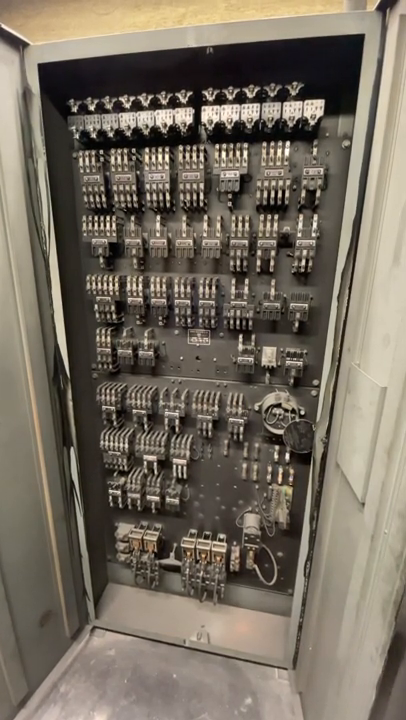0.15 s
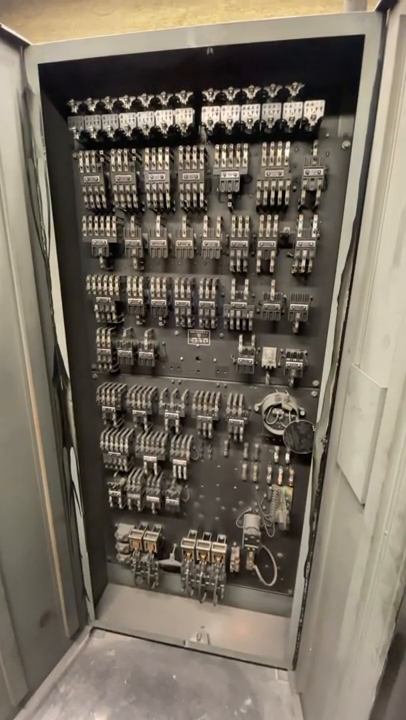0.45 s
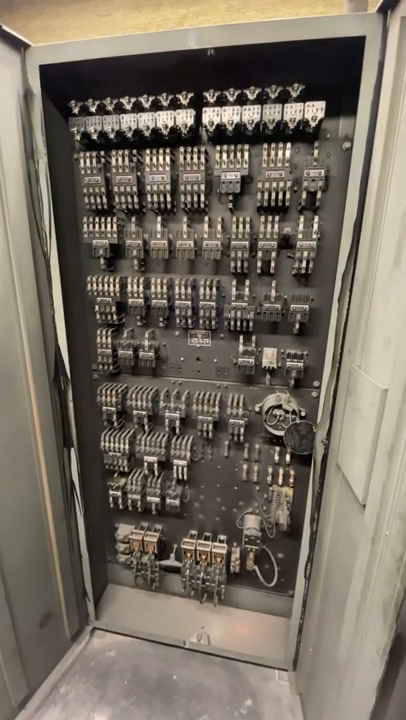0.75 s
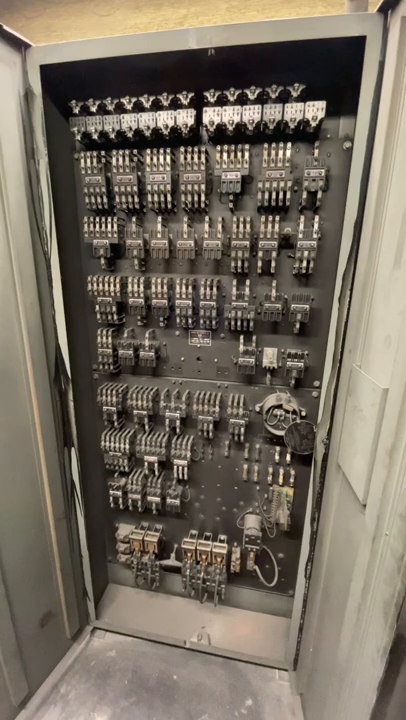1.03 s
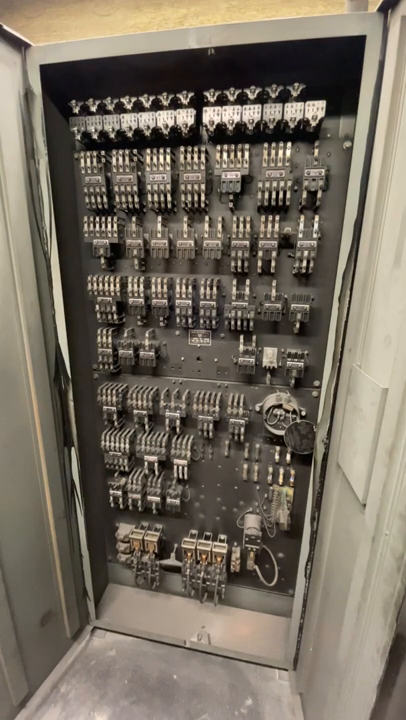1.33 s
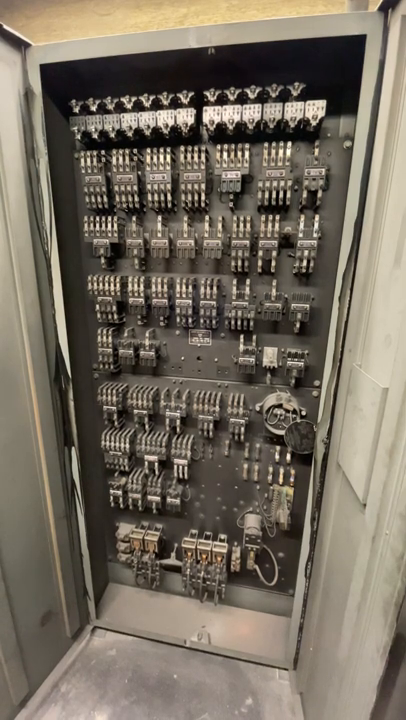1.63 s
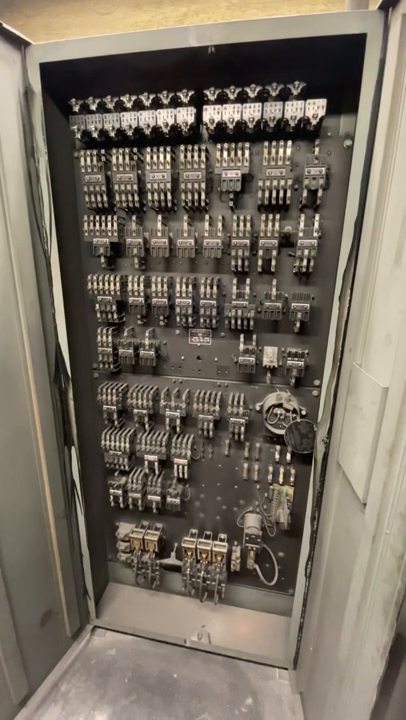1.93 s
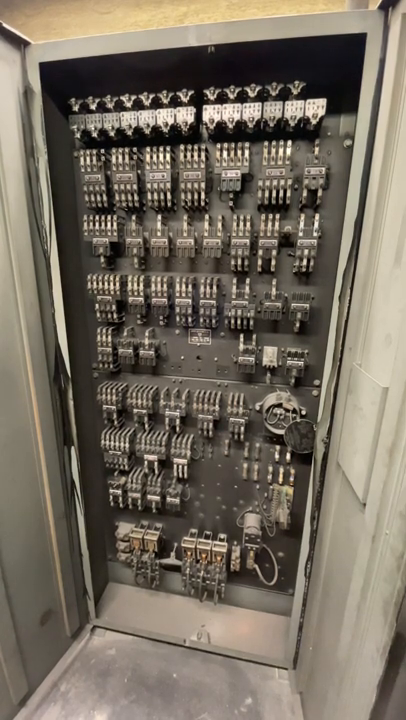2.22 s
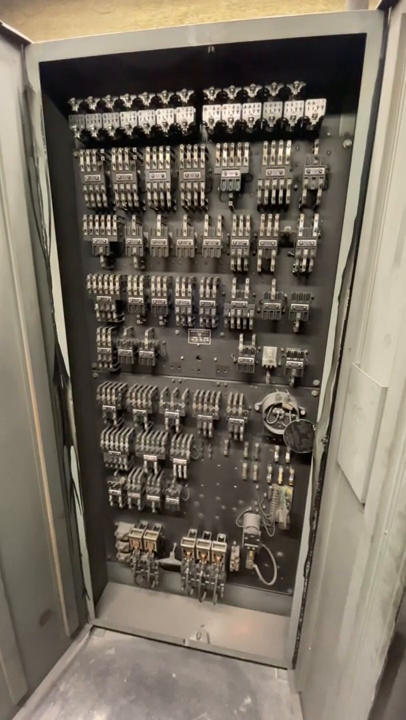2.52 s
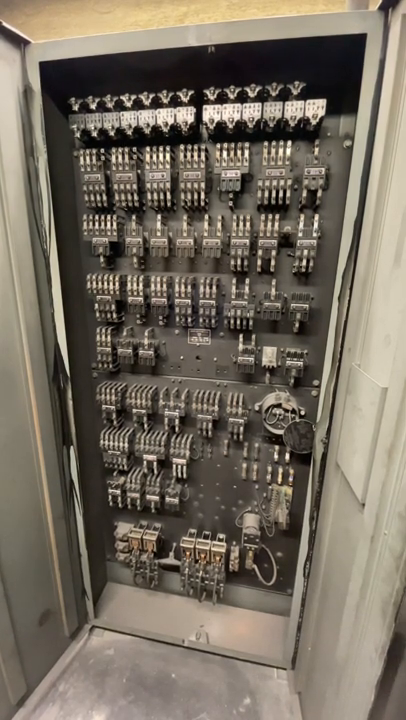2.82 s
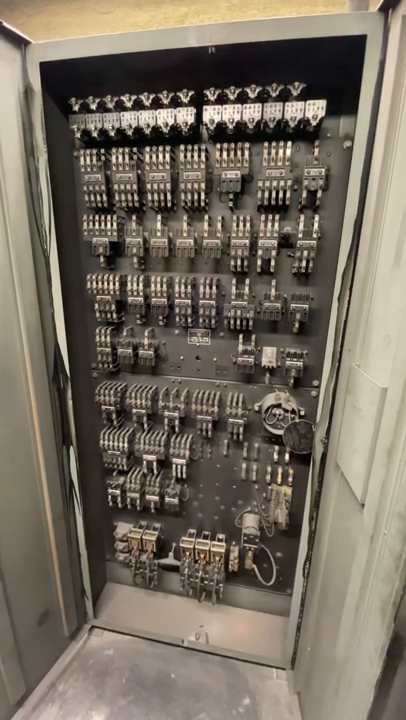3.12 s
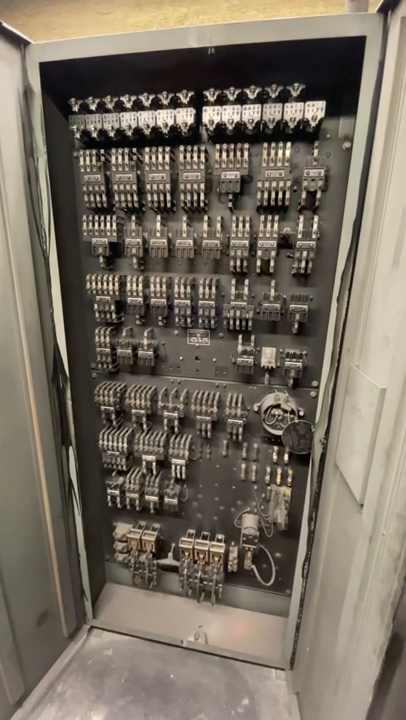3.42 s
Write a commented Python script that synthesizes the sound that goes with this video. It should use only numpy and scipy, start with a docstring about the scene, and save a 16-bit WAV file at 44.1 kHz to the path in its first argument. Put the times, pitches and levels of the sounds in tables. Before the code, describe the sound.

Electrical relays snap and clatter on a steel panel, with fans droning and a thin whine behind.

```python
"""Relays on a steel panel in an open metal cabinet pull in and drop out, alone and in quick bursts.
Each contact is a noise crack and pitched knock that rings frames, springs and armatures and dies in the cabinet.
Fans and hum fill the machine room: coloured noise with broad drones, wavering sine lines and a thin whine.
Two close microphone ports pick it up; a slow gain control ducks after loud treble bursts."""
import sys
import numpy as np
from scipy import signal
from scipy.fft import rfft, irfft
from scipy.io import wavfile

SR = 44100
rng = np.random.default_rng(int(sys.argv[2]) if len(sys.argv) > 2 else 0)


def wav_out(sig):
    """Save sig, one row per channel (or a flat mono array), as 16-bit PCM at SR to the path in sys.argv[1]."""
    wavfile.write(sys.argv[1], SR, np.round(np.clip(np.atleast_2d(sig).T, -1, 1) * 32767).astype(np.int16))


N = 156996

# machine-room air noise, before drones and level changes: [hz, density_db_per_hz]
AIR = [(22, -84), (50, -63.5), (80, -67), (120, -60.5), (250, -59.5), (420, -61.5), (700, -60.5),
       (1300, -70), (2600, -71.5), (3900, -79), (4900, -67.5), (6000, -78), (7800, -89), (9500, -84),
       (11000, -96), (12800, -95.5), (14000, -125)]
# broad drones of ducts and housings: [centre_hz, width_hz, over_air_db]
DRONES = [(91.7, 11.6, 8), (145.9, 5.3, 10.5), (195.1, 29.3, 11.5), (303, 8.9, 7), (331.1, 15.8, 12.5),
          (1067, 16.4, 7.5), (1910, 76, 10.5)]
# level of the air noise and drones below the low top: [time_s, level_db]
LOW_AIR_LEVEL = [(0, -1.5), (.5, -2), (1.05, -0.5), (1.4, -1.1), (1.9, 0.2), (2.2, -2), (2.6, 2),
                 (3.1, -1.3), (3.56, -1)]
# mains and motor hum lines, before waver: [pitch_hz, level_db_rms]
HUM = [(359.5, -41)]
# level of a thin whine, before waver: [time_s, level_db_rms]
WHINE = [(0, -47), (.8, -46.5), (1.05, -54), (1.9, -51.5), (2.5, -47), (3.56, -47)]
LOW_AIR_TOP_HZ, WHINE_HZ = 600, 1437.5
AIR_FLICKER_DB, HUM_WAVER_DB = 1.23, 2

# relay contacts, relative levels: [start_s, level_db, tilt_db_per_octave, knock_hz, knock_db, knock_t60_s,
# ping_db, jangle_db]
CONTACTS = [(0.8936, -34, 6.5, 5400, -24, .03, -44, -34),
            (0.8965, -21, -5.5, 1760, -6.5, 0.016, -19.5, -41),
            (0.9017, -28, -1.5, 1486, -22, 0.2, -43, -29), (2.046, -30, -2.5, 14800, -24, .03, -24, -45),
            (2.0564, -21.5, -3, 2060, -4, 0.019, -25, -39), (2.0572, -29, 3, 3680, -11, 0.042, -24, -41),
            (2.07, -29, -8, 3440, -14.5, 0.11, -36, -34), (2.095, -24, 0.5, 3850, -16, 0.033, -24, -29),
            (2.096, -22.5, -3, 2025, -9.5, 0.033, -24, -26), (2.099, -33, -6, 2730, -13, .03, -22, -38),
            (2.217, -44.5, 8, 3000, -41, .03, -42, -27), (2.2252, -29, -1, 9000, -12, .02, -39, -32),
            (2.238, -36.5, -12, 8650, -15, 0.019, -61, -30), (2.326, -32, 3, 6250, -32, 0.044, -34, -39),
            (2.332, -31, -8.5, 1860, -20, 0.056, -27, -37), (2.334, -38, -12, 998, -18, 0.23, -39, -45),
            (2.821, -31, 2, 9300, -19, .02, -30, -40), (2.83, -26, 1, 6440, -32, .03, -27, -19.5),
            (2.838, -31.5, -1, 5370, -27, .03, -23, -22), (2.843, -20.5, 1, 5400, -23, .04, -23, -13),
            (2.849, -34, 5, 1810, -17.5, 0.057, -23, -18), (2.861, -26.5, 5, 946, -16, 0.041, -28, -32),
            (2.869, -26, -4.5, 1820, -20, 0.034, -21, -25),
            (2.909, -22, -1.5, 4320, -13.5, 0.081, -30, -34),
            (2.9078, -19.5, -2.5, 1080, -13, 0.057, -10, -30)]
# cabinet wash after a contact: [hz, relative_db, t60_s]
WASH = [(493, -22, 0.99), (950, -7, 0.63), (2040, -2, 0.58), (4040, 0.5, 0.26), (6500, 3, 0.27),
        (9000, 1.5, 0.14), (11300, -8, 0.2), (13500, -14, .15), (16000, -4, 0.083)]
# relay frame modes, rung by every contact: [pitch_hz, re_contact_db, t60_s]
FRAME = [(1127, -9, 0.069), (1568, -11, 0.094), (1944, -6, 0.06), (2760, -7.5, 0.072), (3350, -4, 0.12),
         (3645, -9.5, 0.14), (3860, -12.5, 0.039), (4340, -31, 0.089), (5036, -7, 0.059), (6360, -4, 0.07)]
# high ping of the contact springs: [pitch_hz, re_ping_db, t60_s]
PING = [(15300, -3, .03), (15480, -9, .11), (15565, -1, .06), (15720, -9, .12)]
# bright jangle of the armatures: [pitch_hz, re_jangle_db, t60_s]
JANGLE = [(10620, -5, .03), (11000, -4, .03), (11175, -3, .045), (11650, -5, .03)]
TILT_PIVOT_HZ = 3000
FRAME_SPREAD_DB, BRIGHT_SPREAD_DB, CHATTER_T60_S = 3, 2, .02
RATTLE_DB, RATTLE_PER_S = 2.5, 1500
CRACK_T60_S, CRACK_RISE_T60_S, TAIL_DB = .0079, .005, -6
# split: share of pitch between the two knock tones; side: gain in the second view
KNOCK_RISE_S, KNOCK_SPLIT, KNOCK_ROUGH_DB, KNOCK_SIDE = .0006, .017, 3.2, .6

# microphone pair: [hz, left_lead_rad, likeness_0_to_1, left_minus_right_db]
PORTS = [(70, 0, .997, 0), (230, 0, .99, 2), (330, -.1, .96, 4.5), (700, -.5, .62, 4.6),
         (1200, -.5, .75, 2.5), (1800, -.7, .72, 3), (2200, -1.1, .35, 0), (3700, -1.6, .3, 0),
         (4300, .8, .3, 2), (5800, 1.4, .25, .5), (6600, 2.6, .6, -1), (7300, 3.14, .85, -.5),
         (9200, 4.1, .65, -1.5), (10300, 6.28, .98, 0), (11800, 6.3, .97, 0), (12500, 7.5, .5, 0),
         (13300, 9.42, .99, 0), (14900, 9.42, .99, 0), (15500, 10.5, .9, .5)]
# share: dB of ducking per dB above the threshold
DUCK_ABOVE_DB, DUCK_SHARE, DUCK_MEMORY_S, DUCK_HEARS_HZ = -26, .76, .23, 2200
STOP_EDGE_HZ = 16400


def from_db(db):
    """Decibels to gain."""
    return 10 ** (np.asarray(db) / 20)


def at_hz(table, hz, axis=1):
    """One column of a table, read on a log-frequency axis."""
    rows = np.array(table)
    return np.interp(np.log(hz + 1e-9), np.log(rows[:, 0]), rows[:, axis])


def drift(rate_hz):
    """Slow chance with spread 1: white noise through two equal low-pass poles, run every 40 samples."""
    r = np.exp(-80 * np.pi * rate_hz / SR)
    noise = rng.standard_normal(N // 40 + 2002)
    slow = signal.lfilter([1], [1, -2 * r, r * r], noise)[2000:]  # drop the run-in
    return np.interp(np.arange(N) / 40, np.arange(len(slow)), slow / slow.std())


def fall(t60_s):
    """Gain per sample of an exponential decay; t60 is at least 5 ms."""
    return from_db(-60 / (max(t60_s, .005) * SR))


def ring(x, hz, t60_s):
    """Two-pole resonator: a unit click sets a decaying sine of starting height 1 ringing."""
    r, w = fall(t60_s), 2 * np.pi * hz / SR
    return signal.lfilter([0, np.sin(w)], [1, -2 * r * np.cos(w), r * r], x + 1e-18)


def clicks(start_s, sizes):
    """Impulse train in two views of the panel."""
    out = np.zeros((2, N))
    out[:, (np.asarray(start_s) * SR).astype(int)] = sizes
    return out


def chatter(start_s, sizes):
    """Contact bounce: a dying burst of random pushes with the mean energy of one click."""
    r = fall(CHATTER_T60_S)
    burst = signal.lfilter([1], [1, -r], clicks(start_s, sizes))
    return np.sqrt(1 - r * r) * burst * rng.standard_normal((2, N))


def air_noise():
    """White noise shaped to the air spectrum, raised around each drone; level flickers slightly."""
    hz, t = np.fft.rfftfreq(N, 1 / SR), np.arange(N) / SR
    gain = from_db(at_hz(AIR, hz))
    for centre_hz, width_hz, over_db in DRONES:
        gain = gain * (1 + (from_db(over_db) - 1) / (1 + (2 * (hz - centre_hz) / width_hz) ** 2))
    noise = rfft(rng.standard_normal((2, N))) * gain * np.sqrt(SR / 2)
    low = 1 / (1 + (hz / LOW_AIR_TOP_HZ) ** 4)
    low_level = from_db(np.interp(t, *np.transpose(LOW_AIR_LEVEL)))
    air = irfft(noise * low, N) * low_level + irfft(noise * (1 - low), N)
    return air * from_db(AIR_FLICKER_DB * drift(2.4))


def hum_and_whine():
    """Steady-pitch sines of wavering level; hum phase differs between views, whine phase does not."""
    t = np.arange(N) / SR
    out = np.zeros((2, N))
    for hz, level_db in HUM:
        level = np.sqrt(2) * from_db(level_db + HUM_WAVER_DB * drift(8.7))
        out += level * np.sin(2 * np.pi * (hz * t + rng.random((2, 1))))
    whine_db = np.interp(t, *np.transpose(WHINE)) + HUM_WAVER_DB * drift(13)
    return out + np.sqrt(2) * from_db(whine_db) * np.sin(2 * np.pi * WHINE_HZ * t)


def machine_room():
    """Air noise plus tonal hum."""
    return air_noise() + hum_and_whine()


def crack_and_wash(start_s, level_db, tilt):
    """Half-octave noise bands, each with a short crack and a longer cabinet decay, roughened by rattle."""
    white = rng.standard_normal((2, 2, N))
    edges_hz = 420 * 2 ** np.arange(0, 5.6, .5)
    jolts = np.minimum(rng.exponential(1, N), 4) - 1.5
    rattle = from_db(RATTLE_DB * np.repeat(jolts, int(SR / RATTLE_PER_S))[:N])
    out, rise = np.zeros((2, N)), fall(CRACK_RISE_T60_S)
    for k, (low, high) in enumerate(zip(edges_hz, edges_hz[1:])):
        hz = np.sqrt(low * high)
        band_db = level_db + tilt * np.log2(hz / TILT_PIVOT_HZ) + at_hz(WASH, hz)
        hits = clicks(start_s, from_db(band_db) ** 2)[0] + 1e-30
        # squared gains: both decays are of power
        crack = signal.lfilter([1], [1, -fall(CRACK_T60_S) ** 2], hits)
        tail = signal.lfilter([1], [1, -fall(at_hz(WASH, hz, axis=2)) ** 2], hits)
        power = crack + from_db(2 * TAIL_DB) * tail
        shape = signal.lfilter([1 - rise], [1, -rise], np.sqrt(power) * rattle)
        band = signal.butter(2, [low, high], "band", fs=SR, output="sos")
        out += 4 * shape * signal.sosfilt(band, white[k % 2])
    return out


def frame_modes(start_s, level_db, tilt):
    """Contact bounce rings the frame resonances, with chance in each mode's strength."""
    out = np.zeros((2, N))
    for hz, mode_db, t60_s in FRAME:
        luck_db = FRAME_SPREAD_DB * rng.standard_normal((2, len(start_s)))
        size_db = level_db + mode_db + tilt * np.log2(hz / TILT_PIVOT_HZ) + luck_db
        out += ring(chatter(start_s, from_db(size_db)), hz, t60_s)
    return out


def bright_modes(modes, start_s, level_db):
    """Contact bounce rings the high resonances of springs or armatures."""
    out = np.zeros((2, N))
    for hz, mode_db, t60_s in modes:
        luck_db = BRIGHT_SPREAD_DB * rng.standard_normal((2, len(start_s)))
        out += ring(chatter(start_s, from_db(level_db + mode_db + luck_db)), hz, t60_s)
    return out


def knocks(start_s, pitch_hz, level_db, t60_s):
    """A dying pair of close tones per contact, roughened as it decays."""
    out = np.zeros((2, N))
    t, rough = np.arange(SR // 4) / SR, from_db(KNOCK_ROUGH_DB * drift(180))
    for at, hz, db, t60 in zip((start_s * SR).astype(int), pitch_hz, level_db, t60_s):
        span = slice(at, at + len(t))
        roughness = rough[span] ** np.minimum(t / t60 * 4, 1)
        envelope = from_db(db - 60 * t / t60) * np.minimum(t / KNOCK_RISE_S, 1)
        # the product is two equal tones around hz
        pair = np.sin(2 * np.pi * hz * t) * np.cos(np.pi * KNOCK_SPLIT * hz * t)
        out[:, span] += [[1], [KNOCK_SIDE]] * roughness * envelope * pair
    return out


def relays():
    """All contacts: crack and wash, frame modes, spring ping, armature jangle, knock."""
    start_s, level_db, tilt, knock_hz, knock_db, knock_t60_s, ping_db, jangle_db = np.transpose(CONTACTS)
    out = crack_and_wash(start_s, level_db, tilt)
    out += frame_modes(start_s, level_db, tilt)
    out += bright_modes(PING, start_s, ping_db)
    out += bright_modes(JANGLE, start_s, jangle_db)
    return out + knocks(start_s, knock_hz, knock_db, knock_t60_s)


def ports(views):
    """Two views are mixed to the likeness, phase lead and balance of the microphone ports."""
    hz = np.fft.rfftfreq(N, 1 / SR)
    lead_rad, balance_db = at_hz(PORTS, hz), at_hz(PORTS, hz, axis=3)
    alike = np.clip(at_hz(PORTS, hz, axis=2), 0, 1)
    shared, own = rfft(views)
    sign = np.array([[1], [-1]])  # left, right
    both = np.sqrt((1 + alike) / 2) * shared + sign * np.sqrt((1 - alike) / 2) * own
    return irfft(both * from_db(sign * balance_db / 2) * np.exp(.5j * sign * lead_rad), N)


def scene():
    """Relays and room at the microphone ports."""
    return ports(relays() + machine_room())


def record(dry):
    """Gain control ducks on recent treble power, smoothed by a raised-cosine memory; the top is cut."""
    treble = signal.butter(2, DUCK_HEARS_HZ, "high", fs=SR, output="sos")
    heard = signal.sosfilt(treble, dry)
    t = np.arange(SR // 2) / SR
    memory = np.sin(np.pi * np.minimum(t / DUCK_MEMORY_S, 1)) ** 2
    power = signal.fftconvolve((heard ** 2).mean(axis=0), memory / memory.sum())[:N]
    over_db = np.maximum(10 * np.log10(np.abs(power) + 1e-12) - DUCK_ABOVE_DB, 0)
    top_cut = signal.cheby2(16, 70, STOP_EDGE_HZ, fs=SR, output="sos")
    return signal.sosfilt(top_cut, dry * from_db(-DUCK_SHARE * over_db))


dry = scene()
out = record(dry)
wav_out(out)
```